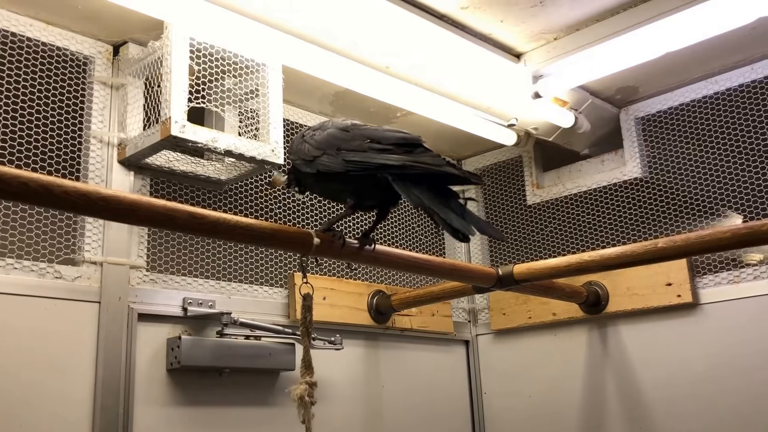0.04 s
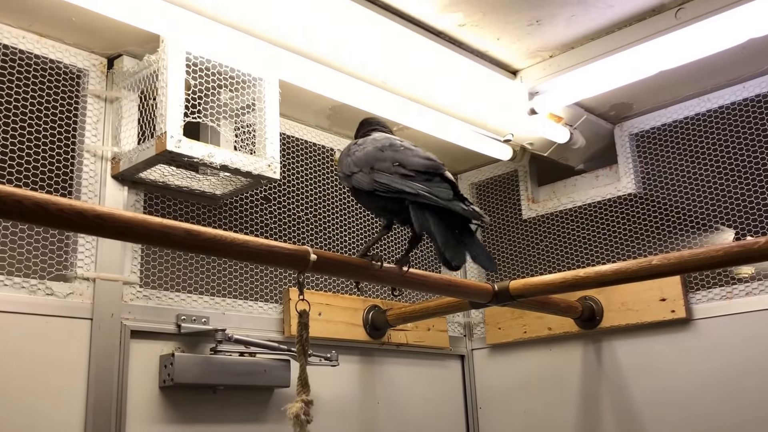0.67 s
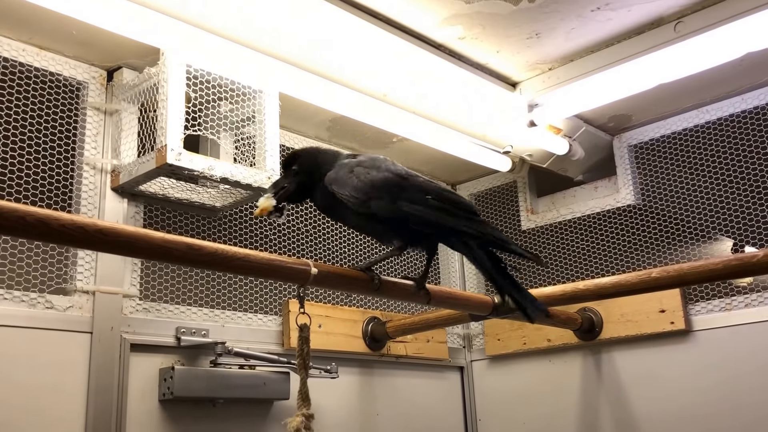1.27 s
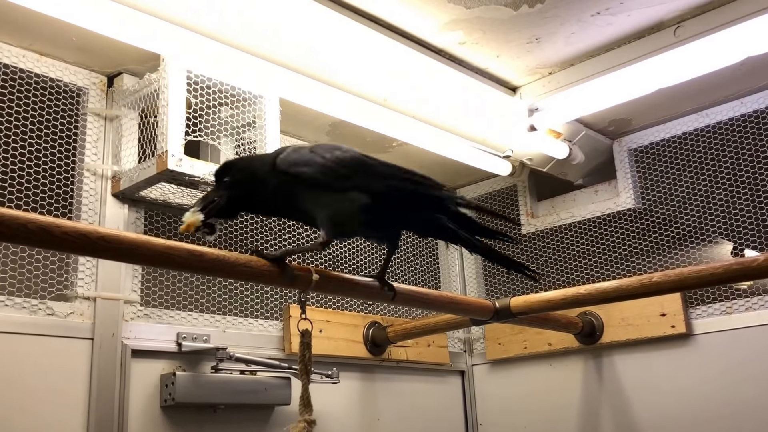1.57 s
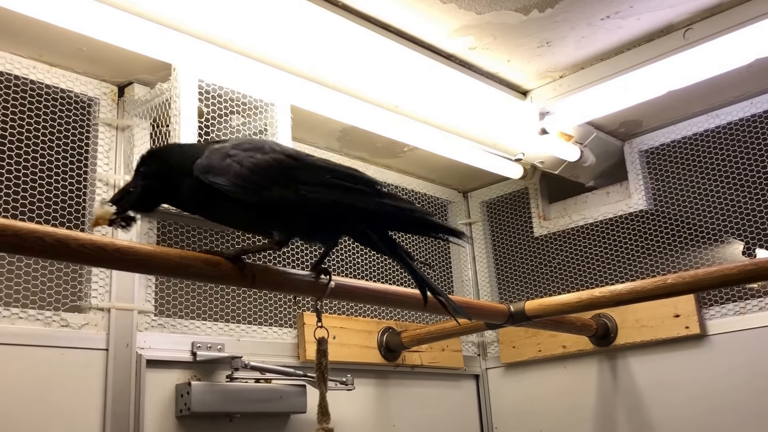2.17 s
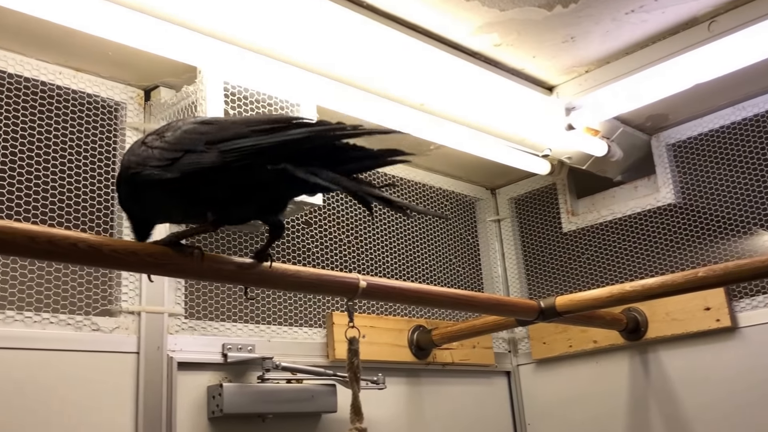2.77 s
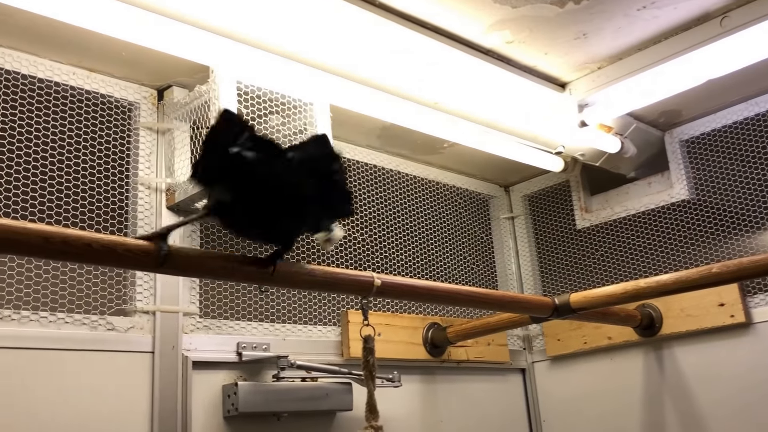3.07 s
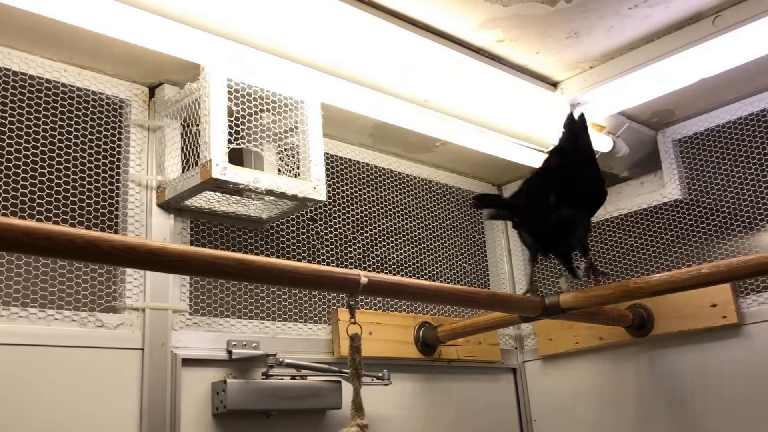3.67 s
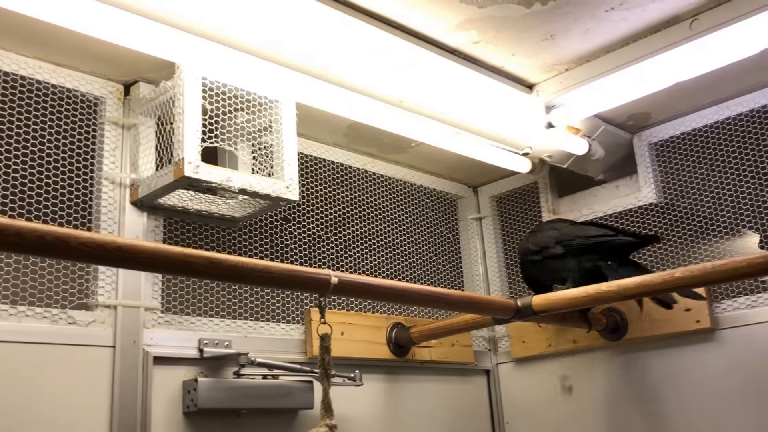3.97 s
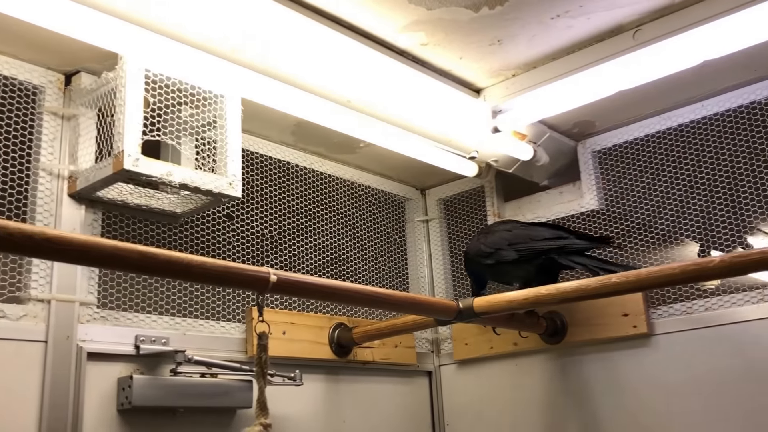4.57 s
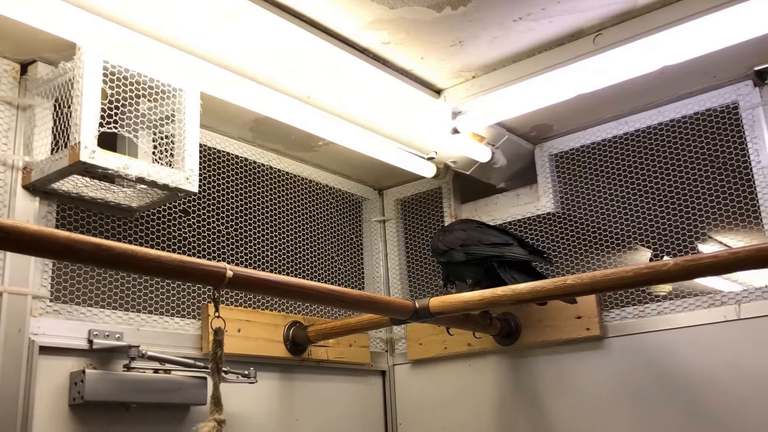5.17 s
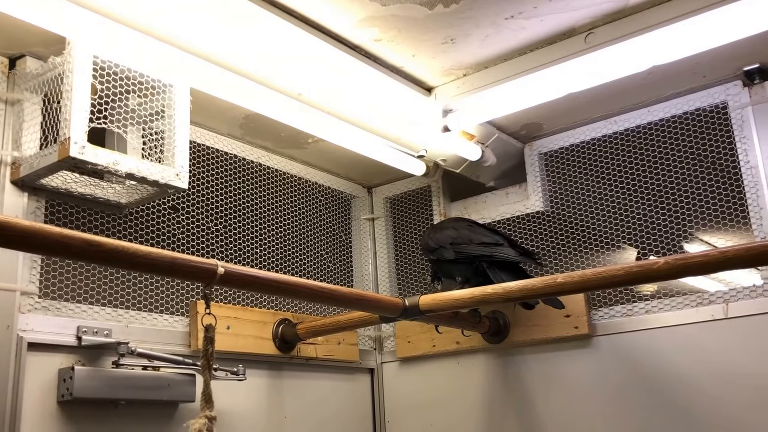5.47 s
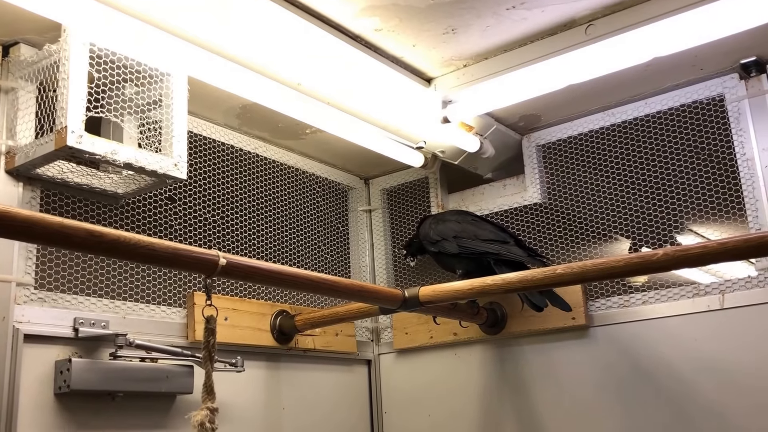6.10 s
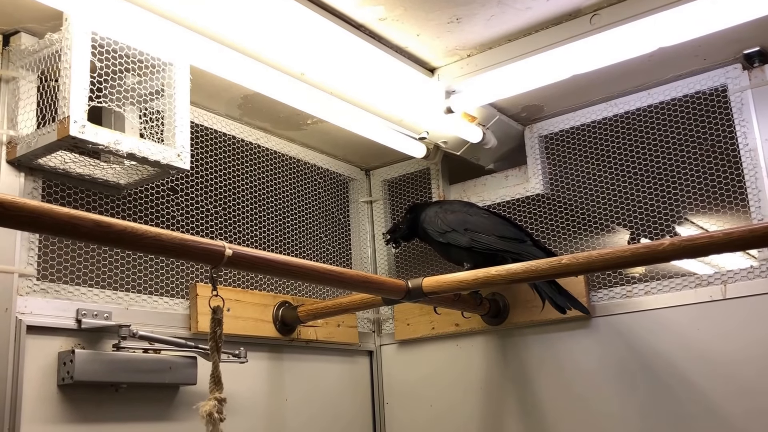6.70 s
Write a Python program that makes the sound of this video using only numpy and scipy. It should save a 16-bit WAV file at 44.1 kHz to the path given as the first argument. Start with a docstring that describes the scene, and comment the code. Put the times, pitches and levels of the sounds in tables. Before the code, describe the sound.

A crow's claws tap along a wooden perch, its wings flap briefly, then one sharp beak knock sounds over a steady fan hum.

```python
"""A small hard-walled aviary, a ventilation fan humming throughout. A crow steps along a wooden perch:
claws tick, toes slide and skid, and the pole thuds under each push. The bird flaps across to a second
perch in a rush of air and rasping feathers, lands and turns with a hop; both jolts clink a steel hook.
Then one sharp blow of the beak cracks on the wood and sets the wall board booming."""
import sys
import numpy as np
from scipy import signal
from scipy.fft import rfft, irfft, next_fast_len
from scipy.io import wavfile
from scipy.ndimage import map_coordinates

SR = 44100
rng = np.random.default_rng(int(sys.argv[2]) if len(sys.argv) > 2 else 0)


def waveform_to_disk(signal):
    """Save audio, clipped to [-1, 1], as 16-bit WAV at the path in sys.argv[1]."""
    frames = np.transpose(np.atleast_2d(signal))
    scaled = np.clip(frames, -1, 1) * 32767
    samples = np.round(scaled).astype(np.int16)
    wavfile.write(sys.argv[1], SR, samples)


N = 301644
TIME = np.arange(N) / SR
HIT_TIME = TIME[:SR * 3 // 4]  # time axis of a one-shot

# reverb decay of the walls: f/Hz, t60/s
WALL_DECAY = [(100, 0.44), (350, 0.39), (1500, .36), (3500, 0.34), (6000, .26), (11000, 0.24),
              (16000, 0.24)]
# air in the fan duct: f/Hz, level/dB
DUCT_EQ = [(20, -30), (33, -12), (45, -8.5), (70, -7.5), (110, -3), (160, -5), (220, -12), (350, -12),
           (440, -17.5), (1200, -19.5), (2000, -25.5), (3800, -36.5), (7500, -41), (8700, -39.5),
           (9500, -42.5), (16000, -47)]
# motor and mains tones: f/Hz, level/dB, waver/dB
HUM_TONES = [(93.4, -70, 4), (120, -65.5, 0.05), (243.6, -80, 3), (342, -79, 2.5), (1150, -90, 4)]
# faint scrapes as the bird feeds: t/s, level/dB, half length/s, f/Hz
FEED_SCRAPES = [(4.342, -66, .025, 3130), (5.5, -69, 0.074, 2200)]
# toes sliding as the grip changes: t/s, level/dB, half length/s
TOE_SLIDES = [(1.048, -64, .025), (1.35, -75, 0.062), (1.565, -61, 0.028), (1.762, -64, 0.085),
              (2.076, -68, .035), (2.457, -64.5, 0.04), (2.57, -69, .07), (4.313, -75.5, 0.12),
              (4.86, -72, 0.075)]
# level and pitch path of a skidding foot: t/s, level/dB, f/Hz
SKID_PATH = [(2.47, -82, 1180), (2.483, -54, 1030), (2.51, -68, 947), (2.548, -62.5, 754), (2.6, -67, 683),
             (2.63, -80, 650)]
# clinks of the steel hook at the landing and the hop: t/s, level/dB, f/Hz
HOOK_CLINKS = [(3.501, -48.5, 3082), (3.838, -48.5, 2820)]
# feet loading the pole: t/s, ring level/dB, relative scuff level/dB, push f/Hz
FOOTFALLS = [(0.402, -51, -69, 213), (0.738, -51, -62, 199), (0.800, -48.5, -63.5, 416),
             (0.910, -47.5, -59, 161), (0.972, -56, -54.5, 110), (1.042, -50.5, -54.5, 440),
             (1.571, -41, -63, 222), (1.688, -36.5, -56.5, 180), (1.748, -41, -54.5, 94),
             (1.780, -44, -52.5, 151), (1.875, -48.5, -63, 205), (1.968, -53.5, -65, 200),
             (2.127, -50, -66, 148), (2.255, -53, -65, 198), (2.495, -36, -54, 105), (2.541, -38, -71, 150),
             (3.195, -44, -60, 232), (3.507, -32.5, -43, 302), (3.586, -48.5, -57.5, 308),
             (3.848, -37, -45.5, 166), (3.841, -46, -59, 1000), (3.915, -59, -50, 260),
             (4.092, -26.5, -59.5, 124), (4.099, -54.5, -66, 640), (4.209, -50.5, -73, 209),
             (4.422, -55.5, -67, 242)]
# bending modes of the pole and its brackets: f/Hz, level/dB, undamped t60/s
POLE_MODES = [(45, -4.5, 0.68), (79.3, -0.5, 0.66), (122, -5, 0.44), (216, 1.5, 0.27), (300, -3, 0.26),
              (425.2, -1, 0.23), (700, -6, .25), (810.6, -16, .25), (1056, -5, 0.273), (1400, -6, .2)]
# a foot scuffing wood: f/Hz, level/dB
SCUFF_EQ = [(60, -15), (200, 2), (330, -0.5), (550, -4.5), (720, -1), (1200, -11.5), (2000, -18.5),
            (5000, -32), (16000, -57.5)]
# claws touching the wood: t/s, level/dB, brightness/dB (-14 is neutral)
CLAW_TICKS = [(0.2884, -61.5, -19), (0.3989, -48.5, -14), (0.7909, -54.5, -18.5), (0.933, -58.5, -23),
              (1.0397, -45.5, -15), (1.5541, -44, -9), (1.5623, -43.5, -16.5), (1.673, -38, -15),
              (1.7743, -49.5, -26), (1.8087, -51.5, -14.5), (1.9661, -47.5, -13), (2.0705, -54.5, -21),
              (2.443, -50, -18), (3.0729, -59.5, -16), (3.1356, -49, -18.5), (3.3479, -40.5, -13),
              (3.488, -45, -11), (3.5184, -36, -14), (3.7383, -52.5, -11), (3.8402, -43, -10.5),
              (4.2605, -53.5, -15), (4.849, -50, -15.5)]
# a tiny hard contact on wood: f/Hz, level/dB
CLICK_EQ = [(200, -14), (900, -0.5), (1900, -3), (2900, 0), (4000, -2), (5500, -1), (8000, -5.5),
            (12000, -8.5), (16000, -14)]
# high modes of the pole and its fittings, woken by hard hits: f/Hz, level/dB, t60/s
HIGH_MODES = [(1534, -8.5, .16), (1882, -8, 0.18), (2560, -12, 0.1202), (2816, 1, 0.12), (3200, -7.5, 0.12),
              (3394, -8.5, .14), (3964, -4, 0.036), (5280, -3, 0.1204), (5595, -1.5, 0.087),
              (7600, -7.5, 0.074)]
# take-off, braking and turning strokes: peak t/s, relative air level/dB, relative hiss level/dB, rise/s
WING_STROKES = [(3.203, -43, -56, 0.04), (3.263, -38.5, -56, 0.011), (3.354, -48, -49, 0.018),
                (3.42, -52.5, -62, .04), (3.514, -40, -50.5, 0.0077), (3.59, -50.5, -58.5, 0.029),
                (3.745, -61, -65.5, .03), (3.844, -47, -57, 0.0039), (3.886, -52, -56, .008),
                (3.932, -48, -58.5, 0.013), (3.985, -69, -63, 0.033)]
# air rushing round a wing: f/Hz, level/dB
AIR_EQ = [(80, -20), (220, -10), (330, -0.5), (450, -4), (580, -1.5), (730, -5), (1200, -5.5), (1700, -8),
          (2150, -9), (2600, -6.5), (3400, -10), (5000, -11), (9000, -24), (16000, -40)]
# hollow resonances in that rush: f/Hz, level/dB, t60/s
HOLLOW_MODES = [(225, -5, 0.077), (440, 0.5, 0.039), (734, -5, 0.073), (1625, -5, 0.036), (1810, -3, 0.039),
                (2550, -7.5, 0.029), (3400, -7, 0.06)]
# feather rubbing on feather: f/Hz, level/dB
FEATHER_EQ = [(500, -25), (2000, -4.5), (4000, 1), (7000, 1.5), (11000, -0.5), (16000, -5.5)]
# crack of the beak on wood: f/Hz, level/dB
CRACK_EQ = [(400, -25.5), (850, -7.5), (1150, -6), (1450, -10.5), (1750, -1), (2100, -10), (2600, -3.5),
            (4200, -0.5), (7000, -0.5), (9000, -3.5), (11000, -4.5), (15000, -12), (16000, -22.5)]
# the second perch and its wall board: f/Hz, level/dB, t60/s
BOARD_MODES = [(124.5, -15.5, .4), (156.3, -6, 0.404), (248, -12.5, 0.27), (304, -2, 0.31),
               (318.3, -12, .25), (369.7, -1, .26), (379, 12.5, 0.021), (419.6, -10.5, 0.2),
               (463, -7, 0.19), (500, -7, 0.25), (541, -15.5, 0.23), (603, -2.5, .26), (662, -8, .26),
               (669, -14, 0.29), (707, -7, 0.22), (1616, -16, 0.27), (1770, -14, 0.2526)]
# dull body under the crack: f/Hz, level/dB
THUD_EQ = [(100, -27.5), (220, -19.5), (330, 0), (450, 0), (700, -2), (850, -18.5), (2000, -29),
           (16000, -60)]

FIDGET_DB, FIDGET_AT_S, FIDGET_HALF_S = -80.5, 2.3, 2  # faint shuffling under it all
PUSH_CYCLES = 2.07  # attack of a push, in cycles of its own pitch
GRIP_DB, GRIP_HZ = -38, 115  # a push this heavy and this slow halves the ring time of the pole
AIR_FALL_S, FEATHER_FALL_S = 0.026, 0.042  # the air settles sooner than the feathers
BLOW_AT_S = 4.6455
LOW_CUT_HZ, HIGH_CUT_HZ = 27, 16050


def amp(db):
    """Decibels to gain."""
    return 10 ** (np.asarray(db) / 20)


def unit(x):
    """Scale to rms 1."""
    return x / np.sqrt(np.mean(x ** 2) + 1e-20)


def along(points, hz):
    """Read (f/Hz, value) points on a log frequency axis."""
    knots_hz, values = np.transpose(points)
    return np.interp(np.log(hz + 1), np.log(knots_hz), values)


def wobble(rate):
    """Smooth random modulation, rate knots a second."""
    return map_coordinates(rng.standard_normal(int(N * rate / SR) + 4), [TIME * rate])


def fade(t, t60):
    """Exponential decay by 60 dB in t60."""
    return np.exp(-np.log(1000) * t / t60)


def swell(at, half_length):
    """A bell-shaped envelope."""
    return np.exp(-((TIME - at) / half_length) ** 2)


def stroke(at, rise, fall):
    """A pointed envelope with exponential attack and release."""
    return np.exp(-np.maximum((at - TIME) / rise, (TIME - at) / fall))


def add(track, at, sound):
    """Drop a sound onto the track, at seconds in."""
    part = track[round(at * SR):][:len(sound)]
    part += sound[:len(part)]


def colour(x, eq):
    """Minimum-phase EQ of unit energy."""
    size = 8192
    cepstrum = irfft(np.log(amp(along(eq, np.fft.rfftfreq(size, 1 / SR)))))
    cepstrum[1:size // 2] *= 2
    cepstrum[size // 2 + 1:] = 0
    kernel = irfft(np.exp(rfft(cepstrum)))
    return signal.fftconvolve(x, kernel / np.linalg.norm(kernel))[:len(x)]


def noise(eq):
    """Steady coloured noise of rms 1."""
    return unit(colour(rng.standard_normal(N), eq))


def burst(eq, rise, sharp, wet_db):
    """A rough contact: noise that peaks after rise seconds, and the diffuse tail that it feeds."""
    force = (HIT_TIME / rise * np.exp(1 - HIT_TIME / rise)) ** sharp
    tail = walls() * np.sqrt(np.cumsum(force ** 2))
    direct = force * rng.standard_normal(len(HIT_TIME))
    return colour(direct + amp(wet_db) * tail, eq) / np.hypot(1, amp(wet_db))


def ring(modes, rise, scatter_db):
    """Damped modes in a new balance at every hit."""
    hz, db, t60 = np.transpose(modes)[:, :, None]
    strength = amp(db + scatter_db * rng.standard_normal(hz.shape))
    partials = strength * fade(HIT_TIME, t60) * np.sin(2 * np.pi * hz * HIT_TIME)
    return partials.sum(axis=0) * (1 - np.exp(-HIT_TIME / rise))


def walls():
    """The dense reverb tail of close walls, of unit energy; treble dies first."""
    hz, t, bands = signal.stft(rng.standard_normal(len(HIT_TIME)), SR, nperseg=256)
    bands *= fade(t, along(WALL_DECAY, hz)[:, None])
    tail = signal.istft(bands, SR, nperseg=256)[1][:len(HIT_TIME)]
    tail *= 1 - np.exp(-(HIT_TIME / 0.004) ** 2)  # the first walls are a step away
    return tail / np.linalg.norm(tail)


def room(x, wet_db):
    """Equal-power blend of the dry sound and the walls."""
    wet = signal.fftconvolve(x, walls())[:len(x)]
    return (x + amp(wet_db) * wet) / np.hypot(1, amp(wet_db))


def fan():
    """The bed: duct noise with wavering motor and mains tones."""
    hum = np.zeros(N)
    for hz, db, waver_db in HUM_TONES:
        tremolo = amp(waver_db * wobble(2.2))
        phase_drift = 0.1986 * waver_db * wobble(7.1)
        hum += amp(db) * unit(tremolo * np.sin(2 * np.pi * hz * TIME + phase_drift))
    flow = amp(0.4 * wobble(2))
    return hum + amp(-61.5) * flow * noise(DUCT_EQ)


def feeding():
    """Short soft scrapes, each a narrow-band swell of noise."""
    out = np.zeros(N)
    for at, db, half_length, hz in FEED_SCRAPES:
        eq = [(hz / 4, -25), (hz * 0.6, -5), (hz, 0), (hz * 1.26, -6), (hz * 1.8, -22), (hz * 6, -40)]
        out += amp(db) * swell(at, half_length) * noise(eq)
    return out


def sliding():
    """Toes and feathers catch and slip in fine grains; each slide swells and fades."""
    grains = unit(rng.standard_normal(N) * amp(3.46 * wobble(450)))
    envelope = amp(FIDGET_DB) * swell(FIDGET_AT_S, FIDGET_HALF_S)
    for at, db, half_length in TOE_SLIDES:
        envelope = np.hypot(envelope, amp(db) * swell(at, half_length))
    return room(envelope * colour(grains, CLICK_EQ), wet_db=0)


def skid():
    """Uneven stick and slip, gliding down in pitch as the foot slows."""
    times, db, hz = np.transpose(SKID_PATH)
    envelope = amp(np.interp(TIME, times, db, left=-120, right=-120))
    phase = 2 * np.pi * np.cumsum(np.interp(TIME, times, hz)) / SR
    slips = unit(wobble(300) * np.sin(phase) + wobble(330) * np.cos(phase))
    return room(envelope * slips, wet_db=-12.5)


def hook():
    """The landing and the hop each jolt a hanging steel hook, whose three modes clink briefly."""
    out = np.zeros(N)
    for at, db, hz in HOOK_CLINKS:
        modes = [(hz, 0, 0.06), (hz * 0.65, -4, 0.05), (hz * 2, -9, 0.04)]
        clink = ring(modes, rise=0.00017, scatter_db=7)
        add(out, at, amp(db) * room(clink, wet_db=-2))
    return out


def steps():
    """A soft foot scuffs the wood and rings the pole modes near the pitch of its push."""
    out = np.zeros(N)
    for at, ring_db, scuff_db, push_hz in FOOTFALLS:
        grip = amp(ring_db - GRIP_DB) * (GRIP_HZ / push_hz) ** 2  # slow and heavy chokes the ring
        modes = [(hz, db - 8 * abs(np.log2(hz / push_hz)), t60 / (1 + grip ** 2))
                 for hz, db, t60 in POLE_MODES]
        thud = amp(ring_db) * ring(modes, rise=PUSH_CYCLES / push_hz, scatter_db=0.93)
        scuff = amp(scuff_db + 3) * burst(SCUFF_EQ, rise=0.007, sharp=1, wet_db=8.5)
        add(out, at, room(thud, wet_db=-7.5) + scuff)
    return out


def claws():
    """Each claw gives a tiny crack with its own brightness and pings the pole's high modes."""
    out = np.zeros(N)
    for at, db, bright_db in CLAW_TICKS:
        tilt = 1.14 * (bright_db + 14)  # dB per octave, for an octave either side of 5 kHz
        eq = [(hz, level + tilt * np.log2(hz / 5000).clip(-1, 1)) for hz, level in CLICK_EQ]
        crack = burst(eq, rise=0.00058, sharp=0.35, wet_db=2.5)
        detune = 1 + 0.0254 * rng.standard_normal(len(HIGH_MODES))  # each spot favours other close modes
        modes = [(hz * shift, level, t60) for (hz, level, t60), shift in zip(HIGH_MODES, detune)]
        ping = amp(-16) * ring(modes, rise=0.0003, scatter_db=3)
        add(out, at, amp(db) * (crack + ping))
    return out


def wings():
    """Each stroke is a hollow whoosh of air, with flight feathers rasping over one another."""
    air = np.linalg.norm(
        [amp(db) * stroke(at, rise, AIR_FALL_S) for at, db, _, rise in WING_STROKES], axis=0)
    hiss = np.linalg.norm(
        [amp(db) * stroke(at, rise, FEATHER_FALL_S) for at, _, db, rise in WING_STROKES], axis=0)
    flutter = unit(amp(2 * wobble(220)))
    rasp = unit(amp(2.7 * wobble(900)))
    white = rng.standard_normal(N)
    hollow = unit(signal.fftconvolve(white, ring(HOLLOW_MODES, rise=0.00036, scatter_db=1))[:N])
    whoosh = air * (amp(-8.5) * noise(AIR_EQ) + amp(-9) * hollow)
    feathers = amp(1) * hiss * rasp * noise(FEATHER_EQ)
    return room(flutter * (whoosh + feathers), wet_db=-2.5)


def radiate(x, corner_hz):
    """A small board moves little air below its corner frequency."""
    return signal.sosfilt(signal.butter(1, corner_hz, "highpass", fs=SR, output="sos"), x)


def beak_blow():
    """The beak cracks down; the pole passes the shock to the wall board, which booms a moment later."""
    out = np.zeros(N)
    add(out, BLOW_AT_S, amp(-16.5) * burst(CRACK_EQ, rise=0.0031, sharp=1.52, wet_db=-0.5))
    add(out, BLOW_AT_S, amp(-40) * ring(HIGH_MODES, rise=0.001, scatter_db=4))
    boom = radiate(ring(BOARD_MODES, rise=0.00075, scatter_db=-0.5), corner_hz=149.6)
    add(out, BLOW_AT_S + 0.0078, -amp(-30.5) * room(boom, wet_db=-14))
    add(out, BLOW_AT_S + 0.007, amp(-27.5) * burst(THUD_EQ, rise=0.003, sharp=0.68, wet_db=5))
    return out


def scene():
    """Mono mix of the crow over the fan."""
    footwork = claws() + steps() + hook() + skid() + sliding()
    return (footwork + wings() + beak_blow() + feeding() + fan())[None]


def record(dry):
    """The microphone sheds the deepest bass; a steep high cut trims the very top."""
    size = next_fast_len(N + SR // 2)
    hz = np.fft.rfftfreq(size, 1 / SR)
    high_cut = 1 / np.sqrt(1 + (hz / HIGH_CUT_HZ) ** 240)
    thinned = signal.sosfilt(signal.butter(4, LOW_CUT_HZ, "highpass", fs=SR, output="sos"), dry)
    return irfft(rfft(thinned, size) * high_cut, size)[:, :N]


dry = scene()
out = record(dry)
waveform_to_disk(out)
```